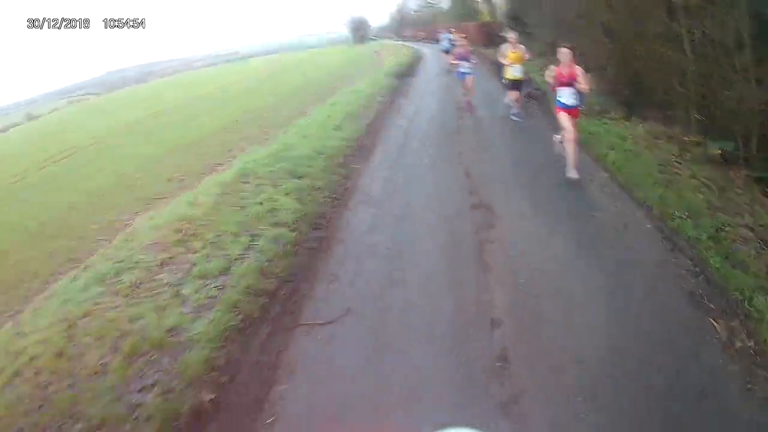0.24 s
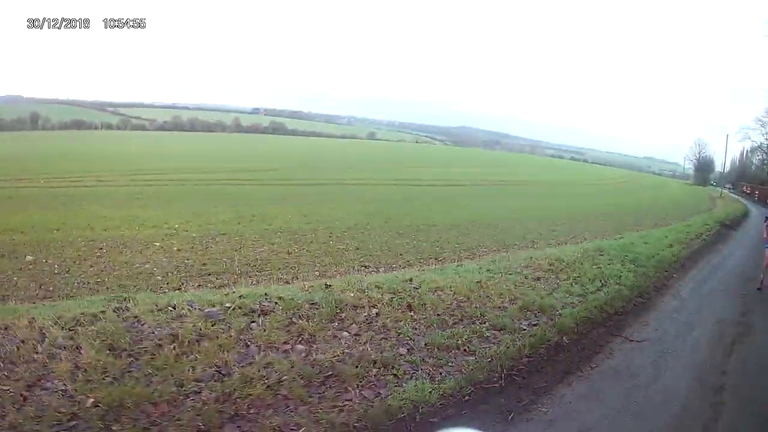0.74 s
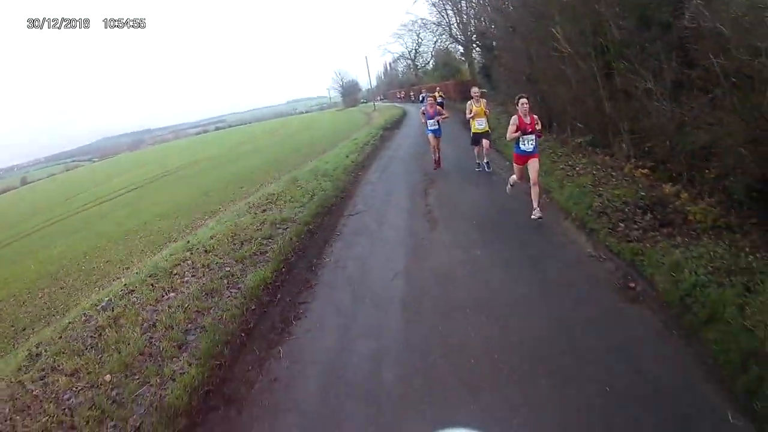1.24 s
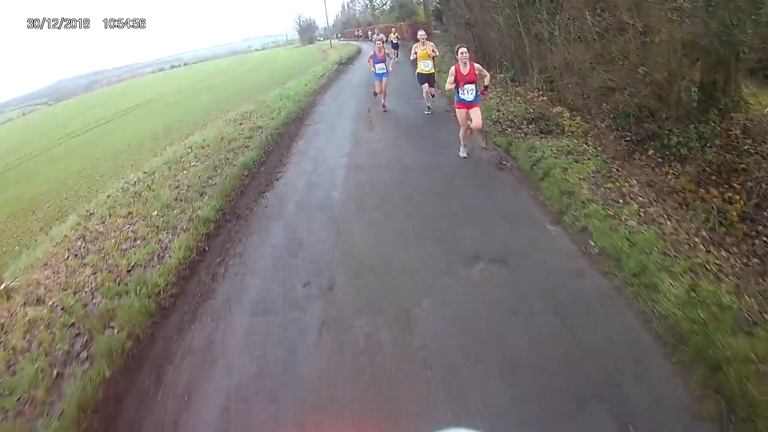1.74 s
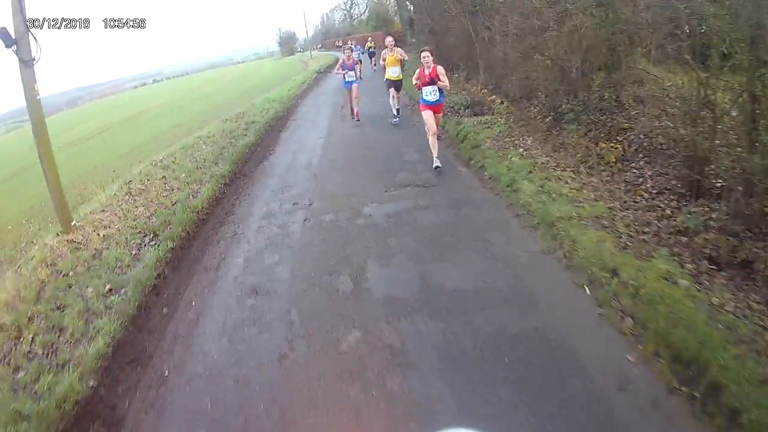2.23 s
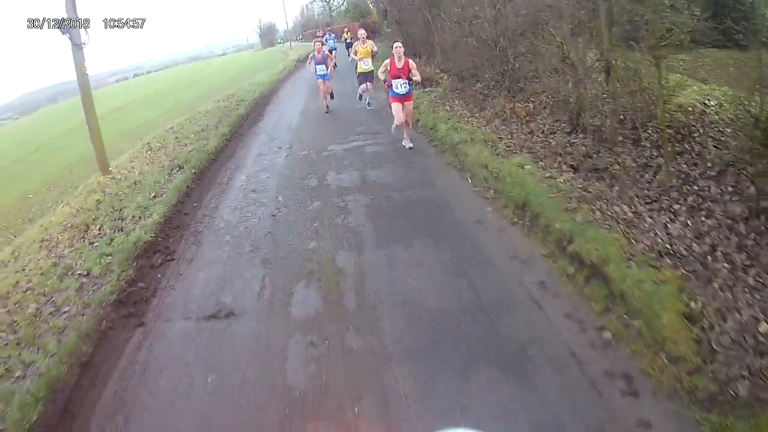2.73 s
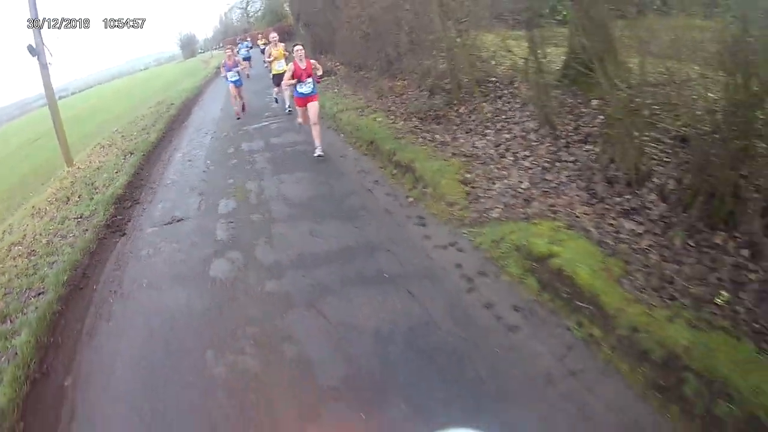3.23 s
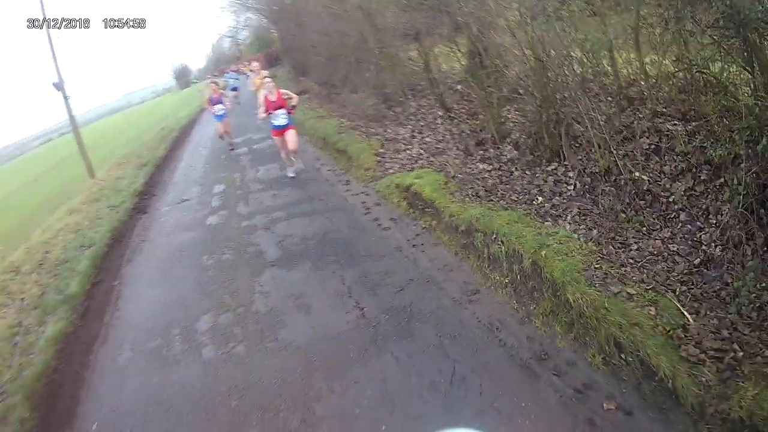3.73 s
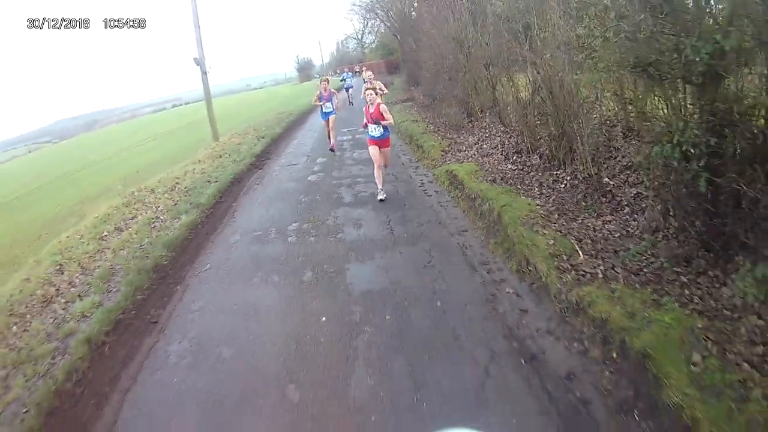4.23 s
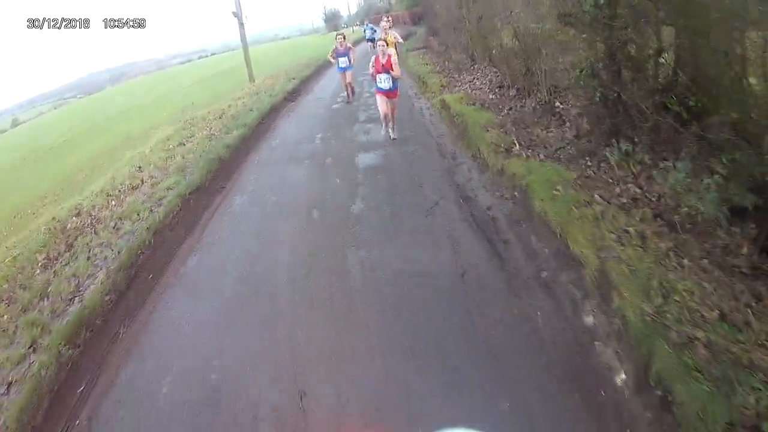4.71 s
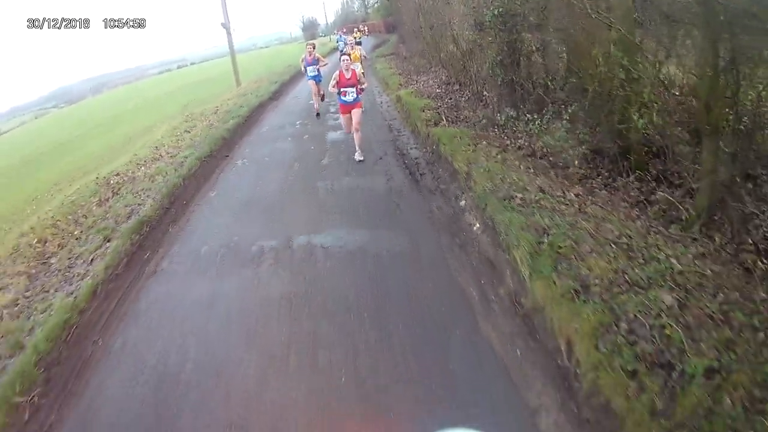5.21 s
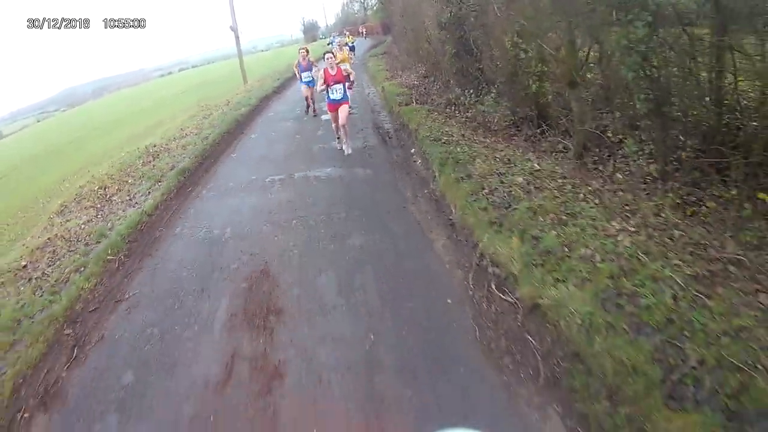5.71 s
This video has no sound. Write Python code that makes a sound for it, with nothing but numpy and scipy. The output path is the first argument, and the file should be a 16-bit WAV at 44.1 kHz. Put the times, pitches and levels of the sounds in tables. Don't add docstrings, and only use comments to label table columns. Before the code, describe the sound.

Close, muffled handling noise of a bike-mounted camera: dull low knocks, boomy rumble and irregular hard-plastic ticks, with faint tyre noise beneath.

```python
import sys
import numpy as np
from scipy import signal
from scipy.fft import rfft, irfft, next_fast_len
from scipy.io import wavfile
from scipy.ndimage import uniform_filter1d, map_coordinates

SR = 44100
rng = np.random.default_rng(int(sys.argv[2]) if len(sys.argv) > 2 else 0)


def voltage_ratio(decibels):
    exponent = np.asarray(decibels, float) / 20
    return 10 ** exponent


def log_audio(samples):
    frames = np.atleast_2d(samples).T
    limited = np.clip(frames, -1, 1)
    pcm = np.round(limited * 32767).astype(np.int16)
    wavfile.write(sys.argv[1], SR, pcm)


N = 262900

# (time [s], slow sway level [dB], judder level [dB])
LURCHES = [(0.0, -30, -36), (0.22, -57, -38.5), (0.35, -35, -35.5), (0.53, -33.5, -36.5), (0.71, -51, -46),
           (0.838, -37.5, -40), (1.0, -43, -49), (1.18, -38.5, -53), (1.34, -39.5, -33.5), (1.53, -48, -32),
           (1.72, -35, -46.5), (1.89, -38.5, -45), (2.08, -38.5, -43.5), (2.42, -41, -37),
           (2.57, -36, -42.5), (2.778, -28, -37.5), (2.95, -43, -48), (3.09, -44, -37.5),
           (3.391, -39, -35.5), (3.64, -45, -43), (4.0, -35.5, -31.5), (4.16, -51, -43.5), (4.31, -33, -39),
           (4.57, -44, -40.5), (4.79, -32.5, -33), (4.95, -34, -48), (5.341, -29, -41.5), (5.48, -37, -39),
           (5.708, -31, -33.5), (5.94, -28.5, -39)]
# (frequency [Hz], density [dB per Hz])
SWAY_COLOUR = [(2.4, -49.5), (4.0, -1.5), (24, 1), (31, -25.5), (53, -120)]
# (frequency [Hz], density [dB per Hz])
JUDDER_COLOUR = [(16, -43), (23, -2), (40, -3), (70, -18), (100, -18.5), (260, -36), (500, -67)]


def heave():
    lurch_s = 0.078
    calm_sway_db, calm_judder_db = -40.5, -49
    at, sway_db, judder_db = np.transpose(LURCHES)
    sway_level = voltage_ratio(swells(at, lurch_s * 0.81, sway_db, calm_sway_db))
    judder_level = voltage_ratio(swells(at, lurch_s, judder_db - 4.0, calm_judder_db))
    sway = sway_level * steady(SWAY_COLOUR, size=2600)
    return sway + judder_level * steady(JUDDER_COLOUR, size=1300)


# (frequency [Hz], width [Hz], level [dB])
MOUNT = [(120.4, 15.56, -1.5), (183.8, 56.6, -13), (288.8, 43.8, -11.5), (338.5, 5.16, -9), (385, 38, -28)]
# (time [s], level [dB])
ROUGHNESS = [(0.0, -50), (0.11, -49), (0.48, -49.5), (0.66, -51.5), (0.9, -51.5), (1.09, -53), (1.7, -50),
             (2.4, -49.5), (2.65, -51.5), (2.77, -45.5), (3.1, -53.5), (3.4, -49.5), (3.65, -49),
             (3.8, -51), (4.4, -51), (4.9, -48.5), (5.43, -51.5), (5.96, -51.5)]
# (time [s], upper modes level [dB], low mode level [dB], housing tap level [dB])
BUMPS = [(0.268, -33.5, -42, -47), (0.312, -33, -38.5, -45), (0.938, -35, -43, -43), (0.959, -41, -42, -40),
         (1.333, -39, -40.5, -45), (1.483, -36.5, -39.5, -39), (1.523, -33, -34.5, -49),
         (1.858, -33, -46, -48), (2.129, -30, -38.5, -44), (2.204, -35, -44.5, -43),
         (2.723, -35, -39.5, -45.5), (2.848, -41.5, -51, -46), (2.904, -41.5, -41.5, -46),
         (3.057, -32, -40, -49), (3.172, -49, -48, -47.5), (3.382, -33, -42, -47), (3.475, -38, -56, -45),
         (3.613, -33.5, -42.5, -31), (3.805, -41, -44.5, -47), (3.965, -29.5, -40, -35.5),
         (4.23, -37, -40.5, -42.5), (4.568, -31.5, -38.5, -36), (4.829, -37.5, -41, -44),
         (5.052, -34.5, -38, -46.5), (5.334, -30, -40, -38.5), (5.599, -29.5, -38, -36.5),
         (5.654, -38.5, -51, -50), (5.694, -36.5, -36, -50), (5.759, -41.5, -40.5, -51),
         (5.879, -31, -35.5, -39)]
# (time [s], upper modes level [dB], low mode level [dB])
SOFT_BUMPS = [(0.154, -56, -48.5), (0.572, -36, -43.5), (1.075, -35.5, -41), (1.209, -40, -43.5),
              (2.384, -35.5, -48), (2.442, -56, -50.5), (2.579, -40.5, -48.5), (4.31, -48, -43),
              (4.393, -48, -43), (4.663, -33.5, -44), (4.722, -38, -46), (5.136, -65, -46.5),
              (5.217, -35, -42.5), (5.443, -35.5, -39), (5.484, -36, -46)]
# (frequency [Hz], width [Hz], level [dB])
PUSH = [(162, 113, -20)]


def mount():
    soft_tap_db = -57
    push_lag_s = 0.00075
    seating = 0.04
    shaken = filtered(grit(grains_db=3.0, rough_db=2.5), modes(MOUNT))
    buzz = voltage_ratio(curves(ROUGHNESS)[0] - 4) * unit(shaken)

    thud, upper, taps = np.zeros(N + SR), np.zeros(N), np.zeros(N + SR)
    t = np.arange(SR // 3) / SR
    tap_t = t[:SR // 16]
    hz, width = MOUNT[0][:2]
    soft_bumps = [(*row, soft_tap_db) for row in SOFT_BUMPS]
    for s, upper_db, low_db, tap_db in sorted([tuple(row) for row in BUMPS] + soft_bumps):
        at = round((s + 0.0013) * SR)
        heavy = -np.sin(2 * np.pi * hz * rng.normal(1, seating) * t)
        heavy *= np.exp(-np.pi * width * t) * (1 - np.exp(-t / 0.0028))
        thud[at:][:len(t)] *= np.exp(-t / 0.005)
        thud[at:][:len(t)] += voltage_ratio(low_db + 11.5) * heavy
        upper[at + round(push_lag_s * SR)] = -voltage_ratio(upper_db + 55.5)
        alone = min(abs(s - click[0]) for click in CLICKS) > 0.016
        tap = voltage_ratio(tap_db - 7.5) * strike(tap_t, [3.5, -2.0, -8, -31, -16])
        taps[at + SR // 1000:][:len(tap_t)] += alone * tap

    def knock_response(f):
        soft = 1j * f / (70 + 1j * f) / (1 + 1j * f / 430) ** 4
        return soft * sum(modes([mode])(f) for mode in MOUNT[1:] + PUSH)

    return buzz + filtered(upper, knock_response) + thud[:N] + taps[:N]


# (time [s], middle modes level [dB],
# then low, upper and top modes levels against the middle [dB])
CLICKS = [(0.2206, -51.5, -10, -16, -23), (0.2862, -41, -9, -22, -36), (0.3735, -49, -19, 8, -9.5),
          (0.752, -58, 1, -11, -29), (0.9046, -45, -2, -22, -18.5), (0.9114, -44, -8, -21, -30),
          (0.9182, -46, -6, -22, -30), (0.9265, -43.5, -5, -9, -15), (0.9585, -48.5, 0, -27, -33),
          (1.346, -30, -12, -25, -35), (1.4924, -33, -8, -16, -24.5), (1.525, -56.5, 6, -15, -22),
          (2.136, -42, -6, -18, -41), (2.1533, -43.5, -14, -0.5, -32), (3.3827, -46, -7, -16, -37),
          (3.5397, -49, -19, -27, -32), (3.6140, -26, -14, -27, -29), (3.6212, -59, -10, -30, -35),
          (3.966, -44, -5, -32, -39), (4.2369, -32, -10, -14, -25.5), (4.572, -49, -2.5, -25, -37),
          (5.6574, -45.5, -7, -20, -33)]


def clicks():
    out, t = np.zeros(N + SR), np.arange(SR // 16) / SR
    for s, db, low_db, upper_db, top_db in CLICKS:
        parts_db = np.add([low_db, 0, upper_db, top_db, top_db], [9.4, 0.26, 26.4, 27.6, 21])
        out[round(s * SR):][:len(t)] += voltage_ratio(db - 2.5) * strike(t, parts_db)
    wall = signal.butter(6, 4800, fs=SR, output="sos")
    return signal.sosfilt(wall, out[:N])


# (frequency [Hz], level [dB], decay by 60 dB [s])
STRUCK_HOUSING = [(993, -4, 0.037), (1084, -8, 0.054), (1373, 2, 0.021), (1510, -2, 0.028),
                  (1833, -7.5, 0.038), (2210, -23, 0.019), (2544, -30, 0.036), (3430, -23, 0.033),
                  (3710, -24, 0.028), (4240, -9, 0.022), (4270, -30, 0.043)]


def strike(t, parts_db):
    bite, bite_s = 0.52, 0.0025
    ring = np.zeros(len(t))
    for hz, db, t60 in STRUCK_HOUSING:
        group = np.searchsorted([1200, 2100, 3000, 3900], hz)
        level_db, detune = rng.normal(0, [1.5, 0.015])
        decay = voltage_ratio(db + parts_db[group] + level_db - 60 * t / t60)
        ring += decay * np.sin(2 * np.pi * hz * (1 + detune) * t)
    ring *= 1 + bite * np.exp(-t / bite_s)
    return ring * (1 - np.exp(-(t / 0.0007) ** 2))


# (frequency [Hz], width [Hz], level [dB])
HOUSING = [(706, 170, -6.5), (998, 170, -8), (1370, 86, 0), (1850, 33, -4), (2346, 110, -16),
           (3430, 98, -26), (4235, 220, -21.5)]
# (frequency [Hz], density [dB per Hz])
ROAD_COLOUR = [(210, -42), (350, -6.5), (571, -13.5), (953, -12.5), (1180, -10.5), (1340, -5), (1630, -12),
               (1870, -11), (2950, -28), (4240, -28), (5670, -47), (7370, -94), (12500, -120)]
# (time [s], level [dB])
WETNESS = [(0.0, -63), (0.41, -57.5), (0.71, -67), (1.31, -67), (1.54, -64.5), (2.29, -60.5), (2.72, -63),
           (3.02, -62.5), (3.35, -64), (4.21, -69), (4.48, -70.5), (4.8, -63), (5.13, -67.5), (5.38, -64.5),
           (5.6, -67), (5.96, -64)]
# (time [s], half length [s], lower, high and top mode levels [dB])
CHAIN_PULLS = [(0.344, 0.23, -61.5, -88, -96), (0.66, 0.16, -67.5, -97, -79.5),
               (1.147, 0.29, -67.5, -86, -80), (1.37, 0.3, -69, -76, -70.5),
               (2.103, 0.46, -75, -79.5, -87.5), (3.105, 0.3, -64.5, -74, -77),
               (3.43, 0.12, -65.5, -87, -87), (3.884, 0.18, -67, -75.5, -77),
               (4.218, 0.27, -69, -75.5, -82), (4.762, 0.31, -66, -78, -81), (5.2, 0.093, -74, -73.5, -82),
               (5.517, 0.26, -64, -74, -76.5)]
SLACK_DB = [-74.5, -87.5, -94.5]


def rolling():
    wet_db, = curves(WETNESS)
    at, half_s, *pull_db = np.transpose(CHAIN_PULLS)
    lower_db, high_db, top_db = [swells(at, half_s, db, slack) for db, slack in zip(pull_db, SLACK_DB)]
    middle_db = -68.5 + 0.8 * wobble(3.77)
    road = unit(filtered(grit(grains_db=1.0, rough_db=1.86), colour(ROAD_COLOUR)))
    bed = voltage_ratio(0.3 * (wet_db + middle_db + lower_db) - 3.5) * road
    tyre = band(HOUSING[:2], wet_db - 3.5) + band(HOUSING[2:3], middle_db - 3.0)
    tyre += band(HOUSING[5:6], high_db - 5)
    chain = band(HOUSING[3:4], lower_db - 3.0) + band(HOUSING[4:5], lower_db - 13.5)
    chain += band(HOUSING[6:], top_db - 3.5)
    return bed + tyre + chain


def band(table, db):
    noise = grit(grains_db=2.0, rough_db=1.9)
    return voltage_ratio(db) * unit(filtered(noise, lambda f: np.abs(modes(table)(f)) ** 1.13))


# (time [s], half length [s], level [dB], pitch [Hz])
RUBS = [(0.29, 0.041, -58, 1370), (0.665, 0.051, -59.5, 1012), (1.142, 0.1, -65.5, 1855),
        (2.966, .04, -63.5, 1840), (3.003, 0.031, -54.5, 1914), (3.045, .05, -57, 1883),
        (3.082, 0.042, -58.5, 1855), (3.087, 0.091, -61, 1370), (3.2, 0.03, -62, 1850),
        (3.43, .11, -58, 1400), (3.52, 0.036, -67, 1370), (3.754, 0.033, -70, 1890),
        (3.828, 0.025, -66, 1850), (3.944, 0.2, -64, 1845), (4.594, 0.083, -61, 1367),
        (4.77, 0.031, -55, 1370), (4.847, 0.026, -56.5, 1370), (5.124, 0.27, -69, 1370),
        (5.647, 0.1, -62.5, 1380)]


def rubs():
    out, s = np.zeros(N), np.arange(N) / SR
    flutter = wobble(150) + 1j * wobble(150)
    for at, half_s, db, hz in RUBS:
        near = slice(round(max(at - 3 * half_s, 0) * SR), round((at + 3 * half_s) * SR))
        level = voltage_ratio(db - 10 * ((s[near] - at) / half_s) ** 2)
        out[near] += level * np.real(flutter[near] * np.exp(2j * np.pi * hz * s[near]))
    return out


# (time [s], half length [s], level [dB])
SCRAPES = [
    (0.893, .006, -65),
    (0.906, 0.022, -52),
    (0.929, 0.0077, -54),
]
# (frequency [Hz], density [dB per Hz])
SCRAPE_COLOUR = [(250, -28), (400, 1.5), (650, -19), (1100, -7.5), (1900, 3), (2800, -23), (4200, -15.5),
                 (6500, -38)]


def scrapes():
    at, half_s, db = np.transpose(SCRAPES)
    drag = filtered(grit(grains_db=-1.0, rough_db=2.5), colour(SCRAPE_COLOUR))
    return voltage_ratio(swells(at, half_s, db, -120)) * unit(drag)


def unit(x):
    return x / np.sqrt(np.mean(x ** 2) + 1e-20)


def curves(rows):
    s, *cols = np.transpose(rows)
    return [np.interp(np.arange(N) / SR, s, c) for c in cols]


def swells(at, half_s, db, calm_db):
    s = np.arange(0, N, 64) / SR
    away = (s - np.asarray(at)[:, None]) / np.reshape(half_s, (-1, 1))
    tops_db = np.asarray(db)[:, None] - 10 * away ** 2
    power = voltage_ratio(2 * calm_db) + voltage_ratio(2 * tops_db).sum(axis=0)
    return np.interp(np.arange(N) / SR, s, 10 * np.log10(power))


def wobble(rate):
    knots = rng.standard_normal(int(N * rate / SR) + 4)
    return map_coordinates(knots, [np.arange(N) * rate / SR])


def grit(grains_db, rough_db):
    return unit(rng.standard_normal(N) * voltage_ratio(grains_db * wobble(400) + rough_db * wobble(25)))


def steady(points, size):
    x = filtered(rng.standard_normal(N), colour(points))
    power = np.abs(uniform_filter1d(uniform_filter1d(x ** 2, size), size))
    return unit(x / np.sqrt(power + 0.097 * np.mean(x ** 2)))


def filtered(x, response):
    m = next_fast_len(N + SR // 2)
    return irfft(rfft(x, m) * response(np.fft.rfftfreq(m, 1 / SR)), m)[:N]


def colour(points):
    f, db = np.transpose(points)
    return lambda hz: voltage_ratio(np.interp(np.log(hz + 1), np.log(f + 1), db, left=-120, right=-120))


def modes(table):
    def response(f):
        total = 0
        for k, (centre, width, db) in enumerate(table):
            damping = 1j * f * width
            total = total + (-1) ** k * voltage_ratio(db) * damping / (centre * centre - f * f + damping)
        return total
    return response


def scene():
    return (heave() + mount() + clicks() + rolling() + rubs() + scrapes())[None]


# (time [s], level [dB])
HISS_BURSTS = [(1.516, -81.5), (2.796, -81.1), (3.607, -81.2), (5.336, -80.8), (5.698, -82.6), (2.76, -84),
               (5.65, -85), (5.95, -80)]


def hiss_gain(quiet):
    swings = [(row[0], -88.5) for row in BUMPS + SOFT_BUMPS if row[2] > -43.2]
    at, db = np.transpose(swings + [tuple(row) for row in HISS_BURSTS])
    marks = np.bincount((at * SR).astype(int), voltage_ratio(2 * db), N)
    jumps = np.abs(signal.fftconvolve(marks, signal.windows.tukey(2000, 0.6), "same"))
    return np.sqrt(quiet ** 2 + jumps)


# (frequency [Hz], density [dB per Hz])
HISS_COLOUR = [(3000, -10), (5500, -1), (7600, -5), (8100, 2), (15900, 2.5)]


def hiss(gain):
    return voltage_ratio(4.5) * gain * unit(filtered(rng.standard_normal(N), colour(HISS_COLOUR)))


def drop_weak_treble(noisy, gain, quiet):
    hz, t, z = signal.stft(noisy, SR, "cosine", nperseg=2048)
    threshold = colour([(1800, -40), (2800, -11), (4200, -12), (5500, -18), (20000, -21)])
    follow = np.where(hz > 7800, 1, 0.4)[:, None]
    lift = (np.interp(t, np.arange(N) / SR, gain) / quiet) ** follow
    kept = z * (np.abs(z) > quiet * lift * threshold(hz)[:, None])
    return signal.istft(kept, SR, "cosine", nperseg=2048)[1][None, :N]


def band_limit(x):
    return signal.sosfilt(signal.butter(12, 15750, fs=SR, output="sos"), x)


def record(dry):
    quiet = voltage_ratio(-92)
    gain = hiss_gain(quiet)
    mix = drop_weak_treble(dry[0] + hiss(gain), gain, quiet)
    return band_limit(mix)


dry = scene()
out = record(dry)
log_audio(out)
```